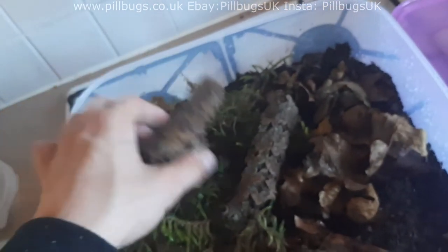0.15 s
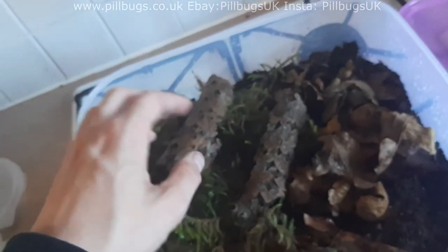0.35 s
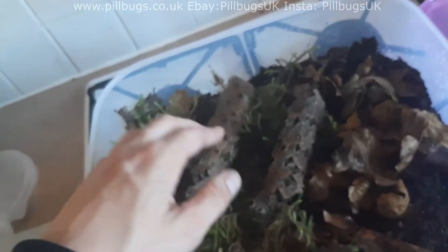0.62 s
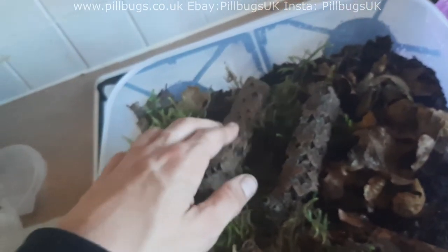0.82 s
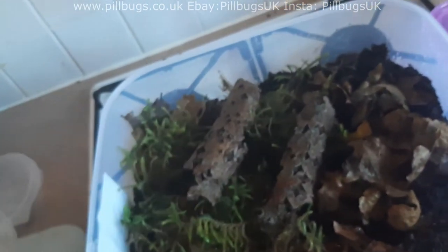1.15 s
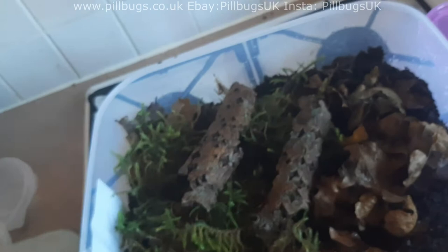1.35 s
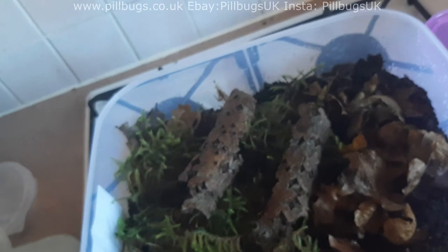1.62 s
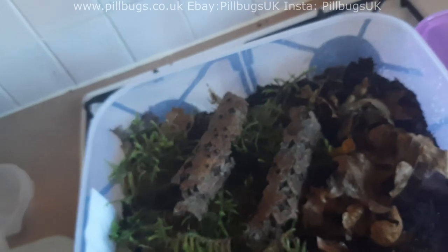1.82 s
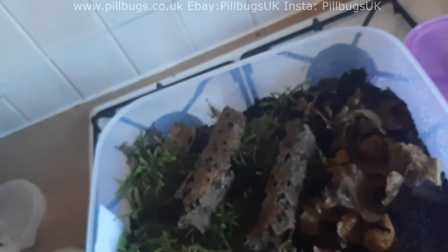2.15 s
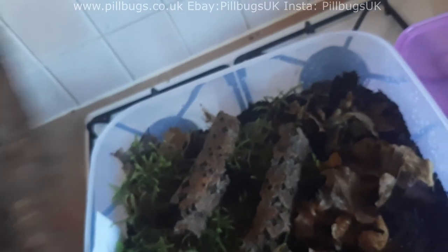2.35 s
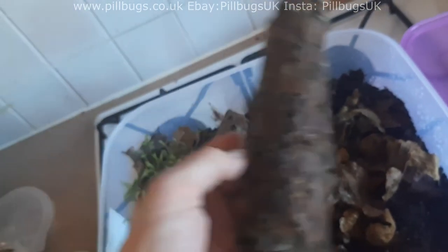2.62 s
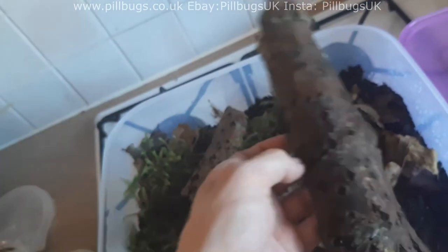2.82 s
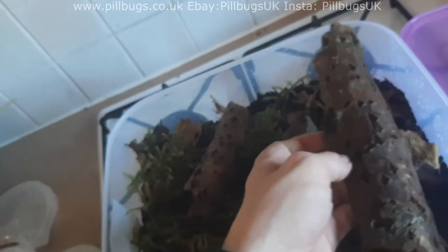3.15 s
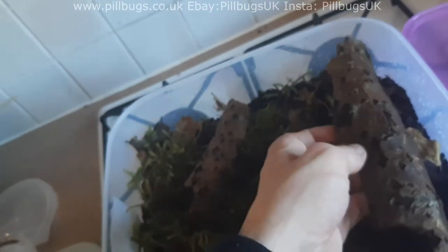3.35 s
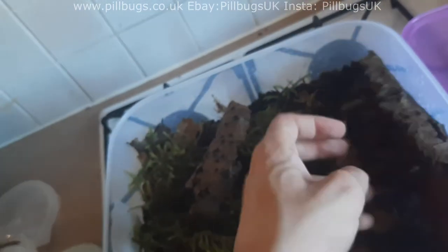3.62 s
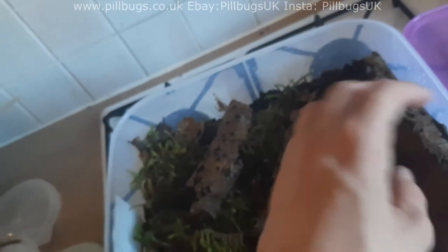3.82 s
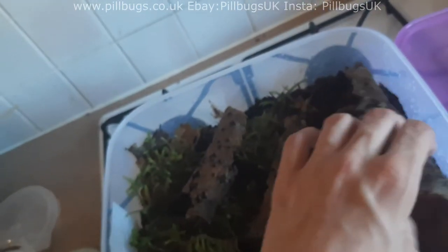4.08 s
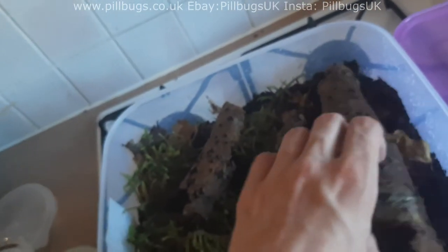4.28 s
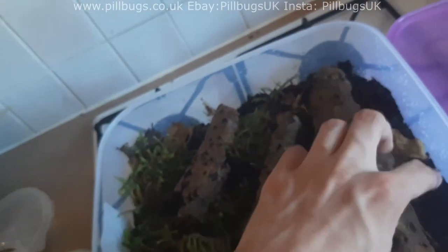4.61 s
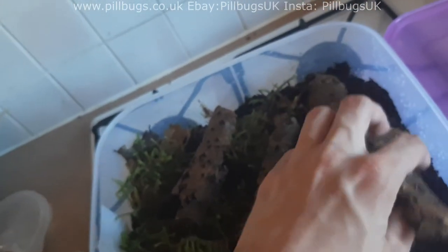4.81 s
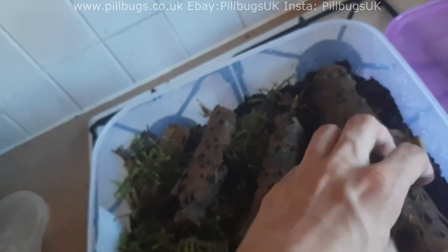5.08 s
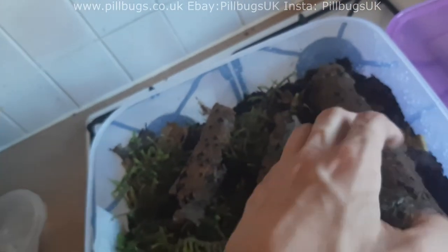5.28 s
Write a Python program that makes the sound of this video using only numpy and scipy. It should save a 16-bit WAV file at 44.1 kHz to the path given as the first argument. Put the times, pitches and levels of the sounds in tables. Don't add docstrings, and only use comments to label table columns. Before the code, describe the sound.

Dry leaves crackle and snap as hands set bark into a plastic tub; loose pieces clack sharply, a larger piece lands, over a low hum.

```python
import sys
import numpy as np
from scipy import signal
from scipy.fft import rfft, irfft, next_fast_len
from scipy.io import wavfile
from scipy.ndimage import uniform_filter1d, map_coordinates

SR = 44100
rng = np.random.default_rng(int(sys.argv[2]) if len(sys.argv) > 2 else 0)


def log_audio(samples):
    frames = np.atleast_2d(samples).T
    limited = np.clip(frames, -1, 1)
    pcm = np.round(limited * 32767).astype(np.int16)
    wavfile.write(sys.argv[1], SR, pcm)


def ratio_of_db(decibels):
    return 10 ** (np.asarray(decibels, float) / 20)


N = 240433
CONTROL = np.arange(0, N, 32)


def evened(x):
    return x / np.sqrt(np.mean(x ** 2) + 1e-20)


def read(points, hz):
    f, value = np.transpose(points)
    return np.interp(np.log(hz + 1), np.log(f + 1), value)


def add(mix, s, sound):
    part = mix[round(s * SR):][:len(sound)]
    part += sound[:len(part)]


def resonate(x, hz, width):
    turn = np.exp(2j * np.pi * np.cumsum(hz * np.ones(len(x))) / SR)
    r = np.exp(-np.pi * width / SR)
    return 2 * (turn * signal.lfilter([1 - r], [1, -r], x / turn)).real


def steep(x, hz, width):
    return resonate(resonate(x, hz, width), hz, width)


def pitched(x, hz, width, wide):
    ring = np.sqrt(SR / (8 * np.pi * width)) * steep(x, hz, width)
    return (ring + wide * x) / np.sqrt(1 + wide ** 2)


def strokes(rows):
    peak, rise, fall, db = np.array(rows).T[:4, :, None]
    u = CONTROL / SR - peak
    away = np.where(u < 0, -u / abs(rise), u / abs(fall))
    return ratio_of_db(db - 20 * away ** 1.32) + 1e-12


def smooth(curve):
    return np.interp(np.arange(N), CONTROL, curve)


def grains(per_s=5000, spread_db=4.0, clump_db=0.0):
    size = ratio_of_db(spread_db * np.minimum(rng.exponential(1, N), 5)) * (rng.random(N) < per_s / SR)
    clumps = uniform_filter1d(rng.standard_normal(N), size=200)
    clumps = evened(uniform_filter1d(clumps, size=200))
    return evened(size * rng.standard_normal(N) * ratio_of_db(clump_db * clumps))


def bursts(events, first):
    u, noise = np.arange(5000) / SR, rng.standard_normal((len(events), 5000))
    noise[:, 0] = first
    t60 = np.maximum(np.array(events)[:, -1:], .003)
    return noise * ratio_of_db(-60 * u / t60)


# f/Hz, level/dB rms, phase/turns
HUM_PARTIALS = [(99.99, -50.8, .78), (199.96, -74.5, .9), (499.96, -86, .54), (99, -71.5, .27),
                (148.52, -78, .25), (198, -72.4, .56), (287.51, -79, .16)]


def hum():
    t = np.arange(N) / SR
    side = np.array([[-1], [1]])
    out = np.zeros((2, N))
    for hz, db, turns in HUM_PARTIALS:
        phase = 2 * np.pi * (hz * t + turns) + 0.062 * side
        out += np.sqrt(2) * ratio_of_db(db + 0.77 * side) * np.sin(phase)
    return out


# f/Hz, level/dB per Hz
FLOOR_SPECTRUM = [(12, -54), (20, -38), (42, -23), (66, -18.5), (101, -14), (126, -11.5), (153, -19),
                  (291, -20.5), (419, -30), (1510, -34), (5310, -36.5), (6640, -39.5), (8780, -39.5),
                  (13700, -33.5), (15800, -35)]
# f/Hz, likeness
FLOOR_LIKENESS = [(25, 0.75), (60, 0.92), (200, 0.22), (400, 0.59), (800, 0.025), (1500, 0.009)]


def floor():
    floor_db, patchy_db = -62.5, .4
    whine_hz, whine_width_hz, whine_db = 6440, 290, -76
    frames, hz = N // 512 + 5, np.fft.rfftfreq(2048, 1 / SR)
    a, b, c, d, patches = rng.standard_normal((frames, 1025, 5)).T
    patches = uniform_filter1d(patches, size=20, axis=0)
    patches = evened(uniform_filter1d(patches, size=8, axis=1))
    same = np.clip(read(FLOOR_LIKENESS, hz), -1, 1)[:, None]
    left = a + 1j * b
    right = same * left + np.sqrt(1 - same ** 2) * (c + 1j * d)
    z = np.array([left, right]) * ratio_of_db(read(FLOOR_SPECTRUM, hz)[:, None] + patchy_db * patches)
    hiss = ratio_of_db(floor_db) * evened(signal.istft(z, nperseg=2048, noverlap=1536)[1][:, :N])
    whine = [evened(resonate(v, whine_hz, whine_width_hz)) for v in rng.standard_normal((2, N))]
    return (hiss + ratio_of_db(whine_db) * np.array(whine)) * ratio_of_db([[-.6], [.6]])


def heave():
    peak_s, rise_s, fall_s, db = 2.72, .5, .45, -72
    level = smooth(strokes([(peak_s, rise_s, fall_s, db)])[0])
    return level * evened(steep(rng.standard_normal(N), 310, 230))


# peak t/s, rise t/s, fall t/s, low body level/dB, upper ring level/dB
SLIDE_JERKS = [
    (0.897, 0.0015, 0.02, -59, -60),
    (.92, 0.033, 0.16, -56, -85),
    (.97, 0.044, 0.14, -79, -52.5),
    (1.026, 0.067, 0.077, -64.5, -81),
]
# f/Hz, width f/Hz, level/dB
SLIDE_BODY = [(257, 51, 3.5), (376, 120, 3.5), (600, 23, 1), (910, 150, -3.5), (2006, 110, -1),
              (2830, 55, -5)]


def slide():
    rub = grains(per_s=12000, spread_db=1.5, clump_db=.7)
    rings = [ratio_of_db(db) / np.sqrt(w) * steep(rub, f, 1.9 * w) for f, w, db in SLIDE_BODY]
    out = np.zeros(N)
    for part, column in ((rings[:4], 3), (rings[4:], 4)):
        level = strokes([(*row[:3], row[column]) for row in SLIDE_JERKS]).sum(0)
        out += evened(sum(part)) * smooth(level)
    return out


def struck(hits, modes):
    u, out = np.arange(8000) / SR, np.zeros(N)
    ring = sum(ratio_of_db(db - 60 * u / t60) * np.sin(2 * np.pi * hz * u) for hz, db, t60 in modes)
    contact = 1 - np.exp(-u / 0.00098)
    for s, db in hits:
        add(out, s, ratio_of_db(db - 4.5) * ring * contact)
    return out


# t/s, peak level/dB
NUDGE = [
    (0.8962, -36.5),
]
# f/Hz, level/dB, t60 t/s
NUDGED = [(432, 1, 0.02), (620, 3, 0.011), (990, 2.5, 0.017), (2100, -8, .02)]


def nudge():
    return struck(NUDGE, NUDGED)


# t/s, peak level/dB
LANDINGS = [
    (3.535, -24),
    (3.606, -26.5),
]
# f/Hz, level/dB, t60 t/s
LARGE_PIECE = [(170, -14.5, 0.15), (418, -4, 0.046), (680, 4, 0.037), (945, -3, 0.025), (1576, 4, 0.018)]


def landing():
    return struck(LANDINGS, LARGE_PIECE)


# t/s, peak level/dB, f/Hz, length/cycles
FIBRES = [(.545, -48, 3800, 2.1), (.5648, -39, 7100, 4), (.579, -43, 7000, 4), (.587, -46, 6800, 4),
          (.593, -47, 5000, 4.5), (.638, -47, 4800, 2.7), (.6555, -37, 7000, 4.3), (.8975, -50, 2100, 4),
          (2.243, -49, 5500, 4), (2.32, -50, 6000, 3), (2.353, -44, 4300, 4.4), (2.3685, -36, 4400, 4.4),
          (2.433, -37, 4900, 4.2), (3.272, -44, 4950, 6), (3.2835, -53, 1250, 3.7), (3.3475, -39, 6900, 3),
          (3.424, -42, 7300, 2.1), (3.5355, -42, 6200, 3), (3.5703, -43, 6330, 3.6),
          (3.6068, -40, 6300, 2.8), (3.6072, -45, 2700, 3), (3.9565, -44, 6000, 3.2),
          (3.998, -36, 5200, 4.3), (4.0105, -48, 4800, 4), (4.2563, -40, 5600, 3.3),
          (4.276, -47, 3960, 2.3), (4.6785, -43, 4650, 8.3), (4.7035, -38, 4300, 5.1),
          (4.824, -50, 5500, 2.6), (4.996, -47, 2000, 2.3), (5.0235, -35, 6500, 3.3),
          (5.1905, -49, 4850, 11), (5.336, -48, 4600, 6.3)]


def ticks():
    u, out = np.arange(400) / SR, np.zeros(N)
    for s, db, hz, cycles in FIBRES:
        v = 4 * u * hz / abs(cycles)
        tick = v * np.exp(1 - v) * np.sin(2 * np.pi * hz * u)
        add(out, s - abs(cycles) / (4 * hz), ratio_of_db(db) * tick)
    return out


# peak t/s, rise t/s, fall t/s, level/dB, f/Hz
RUBS = [(.912, .015, 0.11, -66, 6040), (.965, .04, 0.096, -64, 1960), (1.578, .01, 0.022, -37, 6400),
        (1.581, 0.009, .04, -44, 4240), (1.582, .008, 0.033, -54, 2200),
        (1.595, .025, 0.11, -48, 1440), (1.63, 0.045, 0.1, -59, 620), (1.717, 0.036, 0.12, -55, 2150),
        (1.794, .02, 0.013, -64, 4980), (1.925, .012, .075, -59, 2100), (2.215, .04, .05, -62, 6500),
        (2.23, 0.023, .04, -51, 2150), (2.285, 0.034, .08, -55.5, 2900), (2.29, .04, .07, -56, 4270),
        (2.355, .02, .03, -45, 4530), (2.357, .015, 0.033, -45, 1400),
        (2.367, 0.029, .015, -41, 2750), (2.37, 0.026, 0.025, -57, 735),
        (2.372, 0.027, .012, -41, 1750), (2.404, .02, .015, -49, 4870),
        (2.434, 0.0092, .03, -48, 4800), (2.437, .012, .03, -48, 2800),
        (2.458, 0.037, .025, -52, 1920), (2.463, .03, 0.016, -39, 3160),
        (.35, .03, .04, -52, 3900), (.61, .07, .06, -57, 3550), (3.273, .008, 0.047, -47, 4950),
            (3.365, 0.013, 0.027, -57, 2200), (4.15, .15, .12, -58.5, 5600), (4.279, 0.017, .02, -59, 2200),
            (4.281, .027, .03, -58, 5650), (4.35, 0.068, .08, -73.5, 1230),
            (4.505, 0.033, 0.057, -51.5, 5830), (4.737, 0.014, .02, -49, 2300),
            (4.918, .012, .03, -56, 5400), (4.931, 0.022, 0.048, -52, 2430), (5.097, .012, .025, -58, 4950),
            (5.186, .015, .015, -54, 2160), (5.325, .012, .044, -55, 5900)]


def singing(rub):
    q = 6.2
    rows = RUBS
    out, span = np.zeros(N), np.arange(-4000, 6000)
    for (s, *_, hz), level in zip(rows, strokes(rows)):
        at = np.minimum(round(s * SR) + span, N - 1)
        ring = evened(steep(rub[at], hz, hz / q))
        add(out, at[0] / SR, ring * np.interp(at, CONTROL, level))
    return out


# t/s, peak level/dB, f/Hz, thump level/dB above the knock, t60 t/s
KNOCKS = [(0.317, -47.5, 680, -24, 0.11), (0.897, -49, 547, -1, 0.45), (1.5757, -25, 1160, -12, 0.39),
          (1.599, -29.5, 750, -26, 0.24), (3.322, -49, 596, -2, 0.14), (3.512, -43, 380, -22, 0.12),
          (3.549, -45, 870, -22, 0.19), (3.568, -37.5, 633, 0, 0.11), (3.629, -37.5, 400, -24, 0.13),
          (3.661, -46, 370, 5, 0.087), (3.996, -50, 710, -5, 0.14), (4.049, -53, 980, -23, 0.19),
          (4.918, -51, 950, -19, 0.49), (5.021, -41, 900, -17, 0.15)]


def knock(body):
    for (s, db, hz, thump_db, _), burst in zip(KNOCKS, bursts(KNOCKS, 17.5)):
        add(body, s, ratio_of_db(db - 12.0) * pitched(burst, hz, 400, 1.64))
        add(body, s, ratio_of_db(db + thump_db - 3.0) * pitched(burst, 114, 87, 0.038))


# t/s, peak level/dB, f/Hz, scrape and fizz
# level/dB above it
SNAPS = [
    (.0862, -41, 4560, -4, -6),
    (.1036, -31, 6400, -11, -27),
    (.3182, -37.5, 4480, -14, -19),
    (.5642, -26, 6940, -36, -8),
    (.655, -33, 7060, -28, -5),
         (3.27, -36, 4940, -29, -32), (3.3109, -34, 4970, -25, -18), (3.323, -32, 4670, -19, -7),
               (3.346, -33.5, 7250, -12, -22), (3.423, -36, 6650, -36, -7.5), (3.4645, -56, 5060, -18, -14),
               (3.535, -22, 5000, -37, -18), (3.547, -31, 4870, -11, 3), (3.5687, -30.5, 5900, -7, 0),
               (3.607, -27, 4650, -16, -13), (3.9565, -37, 5900, -36, -14), (3.9972, -31.5, 5000, -41, -6),
               (4.01, -37, 4780, -30, -3), (4.256, -34, 4800, -25, -16), (4.276, -31, 5500, -17, -29),
               (4.604, -35.5, 4520, -21, -20), (4.703, -31.5, 4230, -22, -2),
               (4.735, -49.5, 4860, 9.5, -14), (4.915, -32, 5350, -31, -25), (4.959, -30, 4080, -16, -3),
               (4.994, -41, 4890, -2, -18), (5.023, -27.5, 6000, -6.5, -1), (5.1685, -37, 4970, -18, -26),
               (5.19, -32, 4930, -34, -30)]
# t/s, peak level/dB, f/Hz, scrape level/dB above it, t60 t/s
CLICKS = [
    (1.4935, -66, 4850, -12, .018),
    (1.5754, -14, 3950, -25, 0.0027),
    (1.714, -39.5, 4340, -24, 0.029),
    (1.915, -63, 6280, -11, .018),
    (2.264, -37.5, 6060, -9, 0.017),
    (2.347, -40.5, 4630, -1, 0.13),
    (2.428, -39, 4770, -2, 0.04),
    (2.448, -36, 4970, -10, 0.037),
    (2.4617, -23, 3140, -15, 0.03),
]


def snap(crackle, scrape, fizz):
    leaf_t60_s, click_fizz_db = 0.017, -37
    leaves = [(*row, leaf_t60_s) for row in SNAPS]
    clicks = [(*row[:4], click_fizz_db, row[4]) for row in CLICKS]
    events = leaves + clicks
    quick = ratio_of_db(-60 * np.arange(5000) / SR / 0.007)
    for (s, db, hz, scrape_db, fizz_db, _), burst in zip(events, bursts(events, 8.0)):
        add(crackle, s, ratio_of_db(db - 7) * pitched(burst, hz, 1300, .35))
        add(scrape, s, ratio_of_db(db + scrape_db - 4.5) * burst)
        add(fizz, s, ratio_of_db(db + fizz_db - 9.0) * burst * quick)


# peak t/s, rise t/s, fall t/s (over
# 20 dB), level/dB, f/Hz
PRESSES = [
    (.092, 0.021, 0.091, -57, 4700),
    (.32, 0.0026, 0.054, -60, 4930),
    (.35, .04, 0.12, -61, 4320),
    (.55, 0.031, 0.11, -63.5, 6100),
    (.6, 0.11, 0.081, -54.5, 4200),
    (.706, 0.011, 0.071, -62, 5700),
    (.768, 0.053, 0.077, -63, 4700),
           (3.275, .01, 0.046, -84, 4900), (3.32, 0.067, 0.07, -56, 5070),
                 (3.466, 0.11, 0.12, -60.5, 4830), (3.546, 0.0094, 0.073, -55.5, 4770),
                 (3.606, 0.0067, 0.027, -55, 4770), (3.958, 0.016, 0.055, -69.5, 5850),
                 (4.0, 0.01, 0.21, -61, 4860), (4.288, 0.087, 0.074, -61, 4500),
                 (4.519, 0.069, 0.12, -61.5, 5800), (4.7, 0.15, 0.068, -57.5, 4600),
                 (4.736, 0.11, 0.019, -57.5, 4560), (4.814, 0.066, 0.081, -59.5, 4800),
                 (4.918, 0.03, 0.095, -57.5, 5350), (4.974, 0.11, 0.1, -56.5, 4130),
                 (5.026, 0.011, 0.0082, -46.5, 4930), (5.045, .03, 0.065, -69, 4730),
                 (5.1, 0.033, 0.017, -68, 4940), (5.188, 0.034, 0.015, -62.5, 4950),
                 (5.252, 0.033, 0.12, -58.5, 4940), (5.326, 0.023, 0.11, -54.5, 4600),
                 (5.36, 0.076, 0.13, -72.5, 4500), (5.44, 0.052, .1, -70, 5000)]
TUMBLES = [
    (.898, 0.008, 0.22, -69, 6200),
    (1.496, 0.011, 0.23, -64.5, 5300),
    (1.578, 0.022, 0.02, -34, 4000),
    (1.6, 0.023, 0.091, -48.5, 3950),
    (1.8, 0.081, 0.02, -75.5, 5040),
    (1.922, 0.014, 0.12, -68, 5900),
]
STIRS = [
    (2.214, 0.044, 0.12, -67.5, 6360),
    (2.308, 0.065, 0.052, -60.5, 4840),
    (2.367, 0.018, 0.013, -42.5, 4700),
    (2.458, 0.032, 0.022, -48.5, 5230),
    (2.39, 0.041, 0.075, -56, 4900),
    (2.802, 0.11, 0.1, -74.5, 5170),
    (2.97, 0.055, 0.095, -76, 4570),
]
# peak t/s, rise t/s, fall t/s, level/dB, hollow body level/dB above it
DRAGS = [(0.09, 0.02, 0.09, -61, -4.5), (.32, .005, .1, -84, 11), (.348, 0.037, 0.067, -62.5, -1),
         (.55, 0.043, 0.21, -64, 3.5), (.74, 0.043, 0.11, -77, 4), (0.896, 0.0028, 0.012, -60, 11),
         (.998, 0.078, 0.041, -71, 5), (3.32, 0.072, 0.12, -63, -1), (3.466, 0.044, 0.37, -68, -7),
         (3.538, 0.0048, 0.018, -49, 5), (3.547, 0.013, 0.12, -58, 12.5), (3.609, 0.0047, 0.038, -51.5, 5),
         (4.0, 0.014, 0.09, -86.5, 19.5), (4.078, 0.11, 0.16, -69.5, -2), (4.288, 0.087, 0.047, -64.5, -4),
         (4.518, 0.059, 0.81, -69.5, -5), (4.737, 0.097, 0.083, -62.5, -4), (4.928, 0.035, 0.2, -62, -6),
         (4.974, 0.046, 0.052, -57.5, -25.5), (5.026, 0.02, 0.021, -53.5, -17),
         (5.185, 0.015, 0.013, -67, -17), (5.352, 0.15, 0.14, -61, -3)]
JOSTLES = [
    (1.496, 0.036, 0.17, -65.5, 1.5),
    (1.579, 0.012, 0.019, -26.5, -15),
    (1.599, 0.042, 0.1, -43, 0),
    (1.921, 0.022, 0.037, -60.5, -7),
    (2.223, 0.022, 0.07, -60.5, -29),
    (2.308, 0.067, 0.059, -63.5, -7),
    (2.368, 0.019, 0.018, -39.5, -22),
    (2.46, 0.082, 0.018, -48.5, -18),
    (2.97, .06, .08, -73, -14),
]


def rustle():
    kinds = (PRESSES, 1), (TUMBLES, -15), (STIRS, 0.5)
    rows = [row for table, _ in kinds for row in table]
    fizz_db = [db for table, db in kinds for _ in table]
    bark_rows = DRAGS + JOSTLES
    leaf, bark = strokes(rows), strokes(bark_rows)
    body_level = ratio_of_db([row[4] for row in bark_rows]) @ bark
    common, bands = grains(), []
    for level in (leaf.sum(0), bark.sum(0), body_level, ratio_of_db(fizz_db) @ leaf):
        own = grains(per_s=9000, spread_db=2.2, clump_db=.9)
        bands.append(uniform_filter1d(smooth(level), size=100) * evened(own + 0.51 * common))
    crackle, scrape, body, fizz = bands
    crackle_hz = smooth(np.array(rows)[:, -1] @ leaf / leaf.sum(0))
    crackle = 2.5 * pitched(crackle, crackle_hz, 2200, .6)
    loose = smooth(bark[len(DRAGS):-4].sum(0) / bark.sum(0)) * scrape
    scrape = 2.5 * (pitched(scrape, 2030, 740, 0.64) + .55 * pitched(loose, 2150, 130, 0))
    return (crackle, scrape, body, fizz), common


def causal(db):
    log = np.log(ratio_of_db(np.maximum(db, -100)))
    whole = signal.hilbert(np.r_[log, log[-2:0:-1]])
    taps = np.fft.ifft(np.exp(whole.conj())).real[:len(db)]
    return taps / np.linalg.norm(taps)


# low f/Hz, high f/Hz
BANDS = [(2800, 7800), (1250, 3000), (130, 1250), (7800, 16000)]
# f/Hz, level/dB per Hz
LEAF_COLOUR = [(710, -104), (1200, -7), (1400, -10), (1520, -4), (1680, -11.5), (1950, -11), (2240, -10),
               (2420, -6), (3200, -0.5), (3800, 1), (4920, 0), (7100, 2), (8440, -17), (12600, -13.5),
               (15800, -18)]
# f/Hz, width f/Hz, level/dB
HOLLOW = [(170, 88, -16), (352, 210, -9.5), (687, 76, -5), (990, 750, -6.5), (1360, 110, -8)]


def colours():
    hz = np.fft.rfftfreq(4096, 1 / SR) + 1
    leaf = read(LEAF_COLOUR, hz)
    hollow = sum(ratio_of_db(db) ** 2 / (1 + (2 * (hz - f) / w) ** 2) for f, w, db in HOLLOW)
    impulses = []
    for db, (lo, hi) in zip([leaf, leaf, 10 * np.log10(hollow), leaf], BANDS):
        edges_db = 10 * np.log10((1 + (lo / hz) ** 12) * (1 + (hz / hi) ** 12))
        impulses.append(causal(db - db.max() - edges_db))
    return impulses


def litter():
    bands, rub = rustle()
    crackle, scrape, body, fizz = bands
    snap(crackle, scrape, fizz)
    knock(body)
    scattered = sum(signal.oaconvolve(band, taps)[:N] for band, taps in zip(bands, colours()))
    return singing(rub), scattered


# f/Hz, t60 t/s
ROOM_T60 = [(200, 0.68), (1000, 0.28), (4000, 0.25), (12000, 0.18)]


def room(x):
    taps = np.zeros((6, SR // 2))
    slots = np.arange(30, SR // 2 - 20, 20)
    at = slots + rng.integers(0, 20, (6, len(slots)))
    np.put_along_axis(taps, at, rng.choice([-1., 1.], at.shape), 1)
    hz, t, z = signal.stft(taps, SR, nperseg=256)
    decay = ratio_of_db(-60 * t / read(ROOM_T60, hz)[:, None])
    decay = decay + 8.5 * ratio_of_db(-60 * t / .007)
    decay *= 1 + hz[:, None] / 6000
    tails = signal.istft(z * decay, SR, nperseg=256)[1]
    tails /= np.linalg.norm(tails, axis=1, keepdims=True)
    low = signal.sosfiltfilt(signal.butter(2, 2500, fs=SR, output="sos"), x)
    fed = 0
    for part, turns_per_s in ((low, 37), (x - low, 300)):
        turn = np.arange(N) / SR * turns_per_s + np.arange(3)[:, None] / 3
        fed = fed + np.sqrt(2 / 3) * np.cos(np.pi * turn) * part
    return signal.fftconvolve(fed[:, None], tails.reshape(3, 2, -1), axes=2)[..., :N].sum(0)


# t/s, left port lag/samples, left minus right level/dB
PLACE = [
    (0, -3.5, -0.5),
    (.85, -4, -1),
    (.89, -7.5, -3),
    (1.5, -11.5, 1.5),
    (2.1, -10.5, .5),
    (2.6, -7, -4.5),
    (3.2, 5, -3),
    (5.45, 4.5, -4.5),
]


def ports(x):
    n = np.arange(N)
    s, lag, tilt_db = np.transpose(PLACE)
    lag, tilt_db = np.interp(n / SR, s, lag), np.interp(n / SR, s, tilt_db)
    return np.array([map_coordinates(x, [n - side * lag / 2], order=3) * ratio_of_db(side * tilt_db / 2)
                     for side in (1, -1)])


# f/Hz, left minus right level/dB
PORT_SHADE = [(400, 3), (1100, -4), (2300, 0.5), (4400, -7), (8100, 0), (13000, -4.5)]
TUMBLE_SHADE = [(400, -2), (700, -3), (1250, -3.5), (2400, -5.5), (4400, -3), (8000, 2)]


def housing(hands):
    size = next_fast_len(N)
    hz, t = np.fft.rfftfreq(size, 1 / SR), np.arange(N) / SR
    spectrum, side = rfft(hands, size), np.array([[.5], [-.5]])
    usual, aside = (irfft(spectrum * ratio_of_db(read(shade, hz) * side), size)[:, :N]
                    for shade in (PORT_SHADE, TUMBLE_SHADE))
    return np.where((t > 1.5) & (t < 2.5), aside, usual)


def hand_shade(x):
    lag_s = 1 / (2 * np.pi * 1800)
    return signal.lfilter(*signal.bilinear([.6 * lag_s, 1], [lag_s, 1], SR), x)


def scene():
    direct_db, echo_db = -4.5, -.3
    clean_db, clean_echo_db = 3, -2.5
    sung, scattered = litter()
    clean = sung + slide() + landing() + nudge() + ticks()
    direct = ports(hand_shade(scattered + ratio_of_db(clean_db) * clean))
    echoes = room(scattered + ratio_of_db(clean_echo_db) * clean)
    hands = ratio_of_db(direct_db) * direct + ratio_of_db(echo_db) * echoes
    return housing(hands) + hum() + floor() + heave()


def low_pass(x):
    return signal.sosfilt(signal.butter(12, 15830, fs=SR, output="sos"), x)


def record(dry):
    edge = signal.firwin(401, 15760, window=("kaiser", 9), fs=SR)[None]
    mix = signal.oaconvolve(dry, edge, "same")
    return low_pass(mix)


dry = scene()
out = record(dry)
log_audio(out)
```